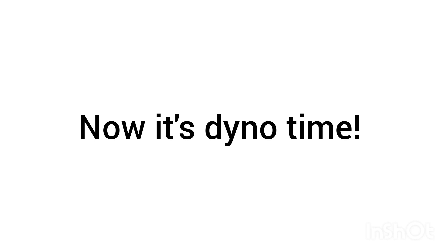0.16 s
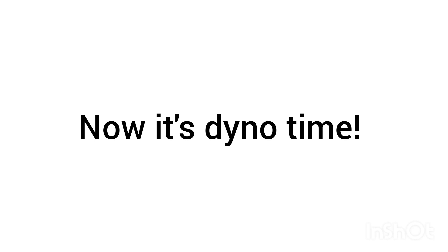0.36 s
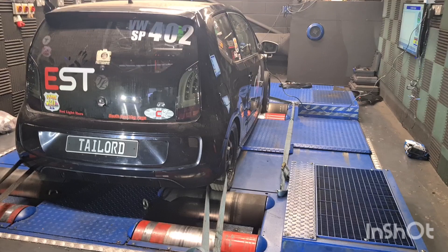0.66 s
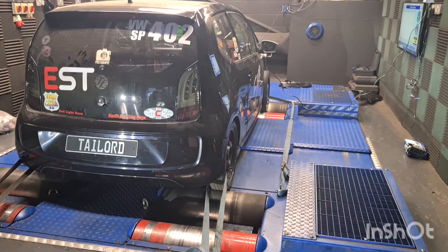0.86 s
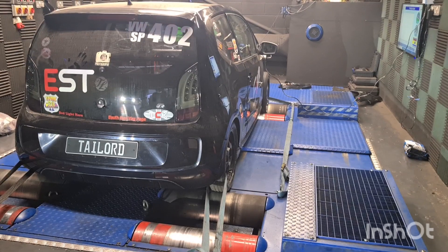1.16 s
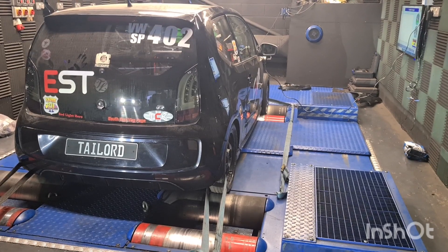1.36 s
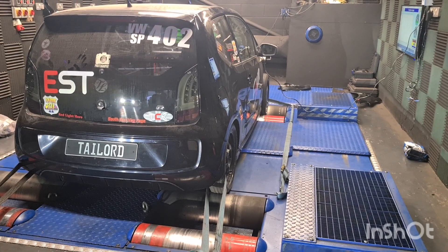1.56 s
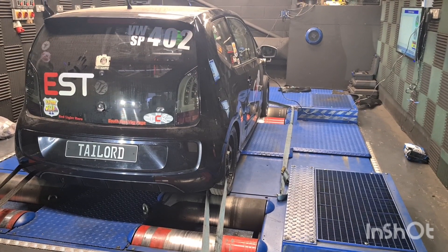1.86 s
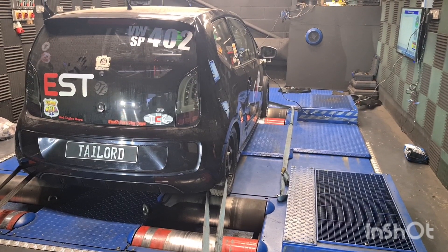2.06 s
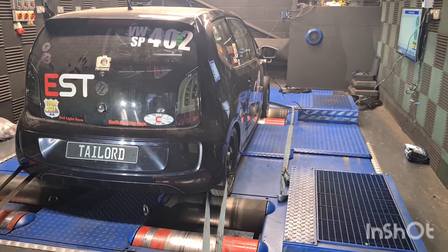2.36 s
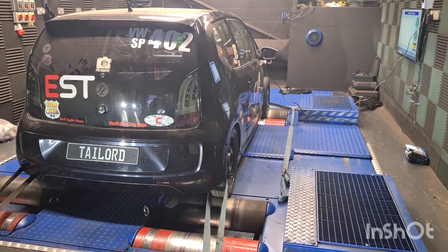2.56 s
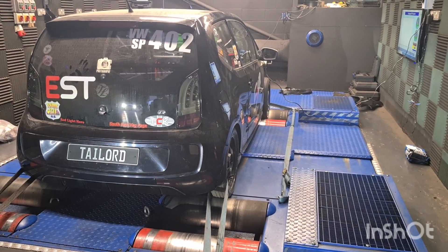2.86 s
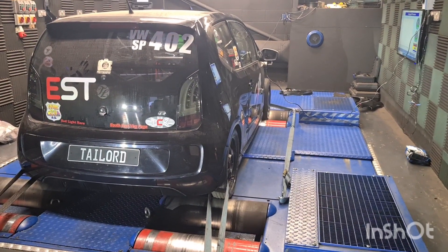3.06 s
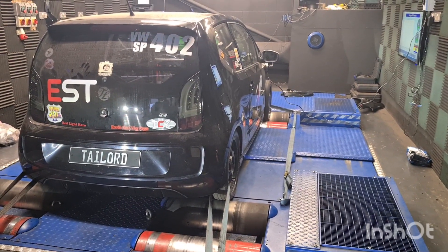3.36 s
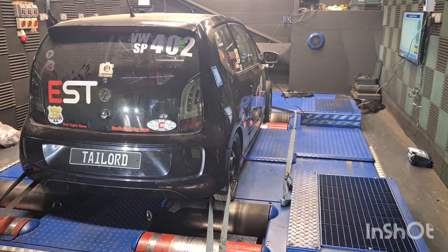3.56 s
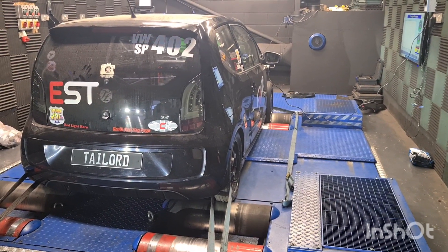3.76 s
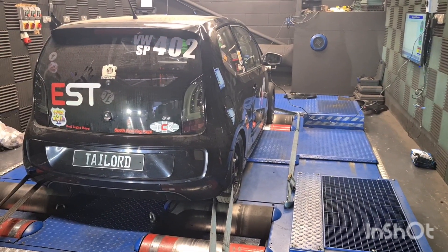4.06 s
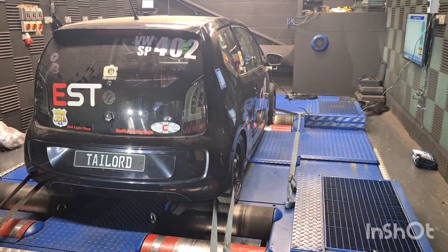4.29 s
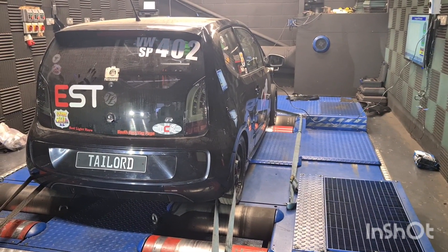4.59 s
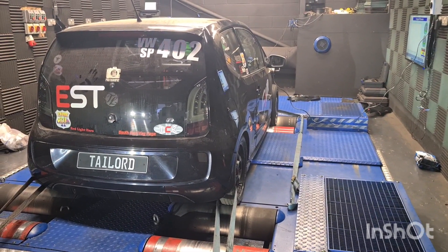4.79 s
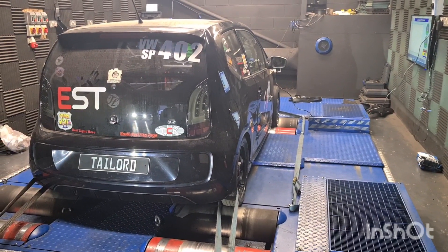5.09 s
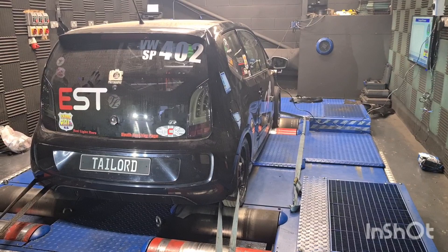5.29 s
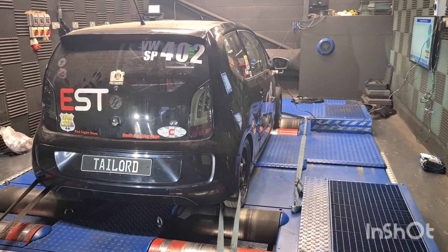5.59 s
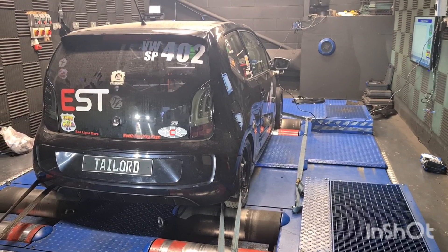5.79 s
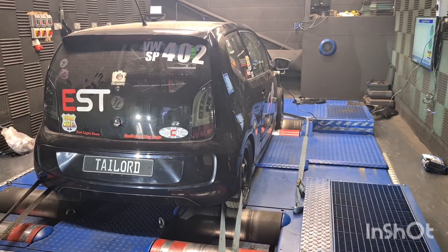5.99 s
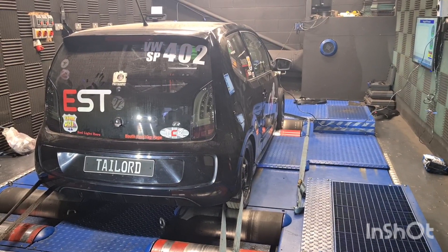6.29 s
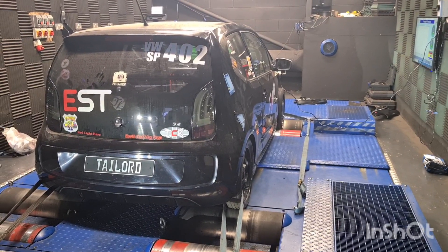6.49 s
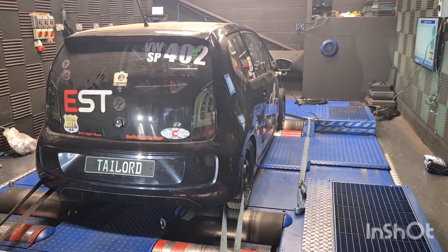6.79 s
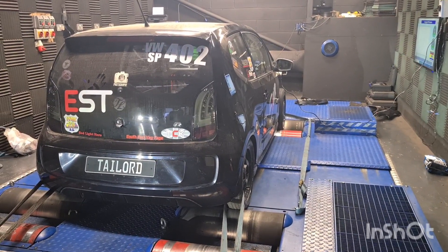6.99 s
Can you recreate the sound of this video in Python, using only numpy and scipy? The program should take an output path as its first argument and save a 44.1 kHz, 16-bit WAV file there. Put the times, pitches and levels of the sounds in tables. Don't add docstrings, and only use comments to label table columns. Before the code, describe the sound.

Silence until about 0.7 s, when a turbocharged five-cylinder car engine cuts in instantly, already pulling hard on dynamometer rollers. The onset is the brightest moment: barking exhaust pulses and a rush of intake air that fades over the next second. The rough, lumpy drone has a firing pitch near 80 Hz, rising quickly at first, then steadily to about 160 Hz by 7.1 s. As it climbs, fixed tailpipe and room resonances swell and recede, colouring the growl. Breathy boost surges brighten it gently around 2.1 s, more strongly at 3.4 s and again near 5.9 s. Exhaust effort is fullest around 5.7 s. Wide, lightly pulsing hiss from gas, tyres and cooling fans runs throughout, its finest top thinning around 4.8 s, above low, lumpy roller rumble. Close stereo perspective behind the car in a padded workshop, slightly saturated, ending with revs still high.

```python
import sys
import numpy as np
from scipy import signal
from scipy.fft import rfft, irfft, next_fast_len
from scipy.io import wavfile

SR = 44100
rng = np.random.default_rng(int(sys.argv[2]) if len(sys.argv) > 2 else 0)


def output_pcm(signal):
    pcm = np.clip(np.atleast_2d(signal).T, -1, 1) * 32767
    wavfile.write(sys.argv[1], SR, np.round(pcm).astype(np.int16))


def gain_from_db(level_db):
    decades = np.asarray(level_db, float) / 20
    return 10 ** decades


N = 314874

START_S = 0.6925
CYLINDERS = 5
RING_UP_S = 0.065
LOW_ORDER, TOP_ORDER = 3, 44


def seconds():
    return np.arange(N) / SR


def rms_one(x):
    return x / np.sqrt(np.mean(x ** 2) + 1e-20)


def filtered(x, order, hz, kind):
    return signal.sosfilt(signal.butter(order, hz, kind, fs=SR, output="sos"), x)


def in_time(rows, lead_s=0):
    knots_s, *columns = np.transpose(rows)
    return [np.interp(seconds() + lead_s, knots_s, column) for column in columns]


def at_hz(points, hz):
    points_hz, values = np.transpose(points)
    return np.interp(np.log(hz), np.log(points_hz), values)


def drift(rate_hz):
    every = 40
    pole = np.exp(-2 * every * np.pi * rate_hz / SR)
    white = rng.standard_normal(N // every + 2002)
    slow = signal.lfilter([1], [1, -2 * pole, pole * pole], white)[2000:]
    return np.interp(np.arange(N) / every, np.arange(len(slow)), rms_one(slow - slow.mean()))


def progress():
    return np.clip((seconds() - START_S) / (N / SR - START_S), 0, 1)


def fade(fade_s):
    return np.exp(-np.maximum(seconds() - START_S, 0) / fade_s)


# start_s, cycles_hz (full two-turn cycles)
SPEED_CURVE = [
    (0.7, 15.88),
    (1.0, 17.05),
    (1.3, 17.91),
    (1.8, 19.12),
    (3.55, 23.42),
    (4.3, 25.22),
    (5.7, 28.51),
    (6.55, 30.61),
    (7.14, 32.15),
]


def firing_phase():
    return 2 * np.pi * CYLINDERS * np.cumsum(in_time(SPEED_CURVE, RING_UP_S)[0]) / SR


# start_s, strength (0-1), fade_s
BOOST_SURGES = [
    (0.75, 1, 1),
    (2.13, 0.32, .6),
    (3.44, 0.67, 0.21),
    (5.63, 0.02, 0.39),
    (5.9, 0.48, 0.26),
    (6.17, 0.2, 0.62),
    (7.0, 0.1, 0.04),
]


def boost_surges():
    t, rise_s, total = seconds(), 0.13, 0
    for peak_s, strength, fade_s in BOOST_SURGES:
        total = total + strength * np.exp(np.where(t < peak_s, (t - peak_s) / rise_s, (peak_s - t) / fade_s))
    return total


# start_level_db, end_level_db (over the pull)
LOW_ORDERS = [(-63, -40), (-39.5, -38.5), (-19.5, -24), (-32.5, -32), (-30, -38.5), (-35.5, -33.5),
              (-32.5, -25.6), (-19.5, -20.5), (-32, -29.5), (-30.5, -34.5), (-26, -36), (-24.5, -31.5),
              (-23.5, -27), (-28, -37), (-33.5, -36.5), (-38, -28.5), (-36.5, -37), (-34.5, -29),
              (-35, -39.5), (-46.1, -42), (-41.2, -33.5), (-35.5, -34.5), (-37.5, -37.5)]
# start_level_db, end_level_db
UNEVEN_CYLINDERS = [
    (0, 9.5),
    (3.5, -11),
    (0, 2),
    (0.5, 6),
    (1.5, -1),
]


def order_levels():
    order = np.arange(LOW_ORDER, TOP_ORDER + 1)
    upper = order[len(LOW_ORDERS):]
    slopes = [(-42.5, 0.3), (-39.5, 0.54)]
    levels = []
    for low, (top_db, loss_db), uneven in zip(np.transpose(LOW_ORDERS), slopes, np.transpose(UNEVEN_CYLINDERS)):
        upper_db = top_db - loss_db * (upper - upper[0]) + uneven[upper % CYLINDERS]
        levels.append(np.append(low, upper_db))
    return list(zip(order, *levels))


# start_s, level_db (pulse strength)
EXHAUST_EFFORT = [(0.7, -3), (1.05, -0.5), (1.42, -3), (2.13, 2), (2.85, 3), (3.3, 3), (3.7, 3.5),
                  (4.28, 0.7), (4.99, 3), (5.71, 5.5), (6.1, 4), (6.55, 3.5), (7.14, 2)]


def exhaust_pulses(firing, boost):
    step = 8
    lope_order = 9
    along = progress()
    sharp_db = (1.5 + 9.5 * boost - 6.5 * along)[::step]
    bark_db = 10 * fade(0.74)[::step]
    along, boost = along[::step], boost[::step]
    cycle = (firing / CYLINDERS + 0.012 * drift(3))[::step]
    tones = 0
    for order, first_db, last_db in order_levels():
        fires = order % CYLINDERS == 0
        scattered = not fires and order >= lope_order
        phase = rng.uniform(0, 2 * np.pi) * scattered
        flicker_db = min(0.2 * order, 2.5) * drift(5)[::step] * (0.3 if fires else 1)
        level_db = first_db + (last_db - first_db) * along + flicker_db
        level_db += sharp_db * (order / TOP_ORDER) ** 2 + bark_db * (order in (15, 20))
        level_db -= 0.5 * boost * (order == 2 * CYLINDERS)
        tones = tones + gain_from_db(level_db) * np.cos(order * cycle + phase)
    tones = signal.resample_poly(tones, step, 1)[:N]
    return gain_from_db(in_time(EXHAUST_EFFORT, RING_UP_S)[0]) * tones


def pipe_roar(firing, boost):
    dull = signal.lfilter([1], [1, -0.892], rng.standard_normal(N))
    puffed = filtered(dull * (1 + 0.44 * np.cos(firing)), 3, 75, "high")
    return gain_from_db(-29 + 3 * boost - 2.5 * progress()) * rms_one(puffed)


def resonate(x, modes, top_hz):
    size = next_fast_len(N + SR)
    f = np.arange(round(top_hz * size / SR)) * SR / size
    response = 0
    for hz, width_hz, left, right in modes:
        mode = 1j * f * width_hz / (hz ** 2 - f ** 2 + 1j * f * width_hz)
        response = response + np.outer([left, right], mode)
    return irfft(rfft(x, size)[..., :len(f)] * response, size)[:, :N]


# pitch_hz, width_hz, left_gain, right_gain
ROOM_RESONANCES = [(54.8, 11.2, 2.75, 3.14), (71.3, 11.4, 0.51, 0.56), (86.1, 7.4, 2.02, 2.46),
                   (107.7, 3.7, 0.33, 0.39), (117.9, 4.0, 2.37, 2.24), (128.4, 6.2, -3.07, -3.61),
                   (145.5, 16.5, -0.33, -0.6), (155.2, 72.1, -1.18, -0.64), (163.6, 3.7, 4.03, 4.26),
                   (179.7, 10.1, 3.27, 3.82), (197.4, 14.3, -3.55, -3.99), (205.3, 60.1, 4.18, 4.14),
                   (220.6, 28.4, -6.08, -6.41), (223.3, 8.3, 5.1, 5.31), (235.9, 11.3, 0.37, 0.56),
                   (258.5, 5.1, -0.87, -0.9), (291.0, 26.9, 3.32, 4.11), (292.2, 37.1, -3.51, -4.4),
                   (306.3, 5.2, 1.96, 2.59), (317.1, 4.4, -1.02, -2.07), (326.9, 22.3, 0.74, 1.31),
                   (343.5, 7.7, -3.29, 0.08), (343.9, 8.9, 3.0, -0.14), (374.7, 24.4, 0.55, 1.42),
                   (387.4, 5.7, 2.34, 1.83), (401.0, 3.7, 1.18, 1.55), (422.3, 10.0, -1.7, -2.71),
                   (441.4, 7.5, -1.7, -1.72), (453.8, 3.7, 0.33, -1.69), (471.3, 4.4, -0.25, 1.58)]
# pitch_hz, width_hz, left_gain, right_gain
PIPE_RESONANCES = [(492.3, 5.3, 2.14, 0.66), (513.0, 18.6, 1.33, 1.34), (529.1, 6.7, 0.67, 4.03),
                   (545.3, 10.4, 3.28, 0.64), (565.7, 7.2, -1.38, -0.21), (595.9, 6.9, 0.16, 0.79),
                   (616.5, 3.7, 0.32, 0.47), (633.5, 4.5, 0.42, 0.73), (655.5, 18.9, 0.79, 0.36),
                   (692.3, 26.2, 4.44, 1.37), (694.0, 22.6, -4.2, -0.33), (722.5, 14.6, 1.33, 0.53),
                   (745.2, 87.5, -2.34, -3.34), (746.8, 55.3, 2.3, 3.53), (809.3, 6.9, -2.05, -0.3),
                   (834.1, 8.3, 2.28, 2.12), (866.3, 7.9, 0.34, 0.37), (880.9, 9.0, -0.6, -1.14),
                   (904.9, 7.3, -0.27, -0.48), (925.6, 11.1, -0.2, -1.16), (969.6, 53.9, -1.04, 0.64),
                   (1024.6, 25.8, 1.34, 1.7), (1044.4, 8.8, 0.76, 1.97), (1097.7, 47.8, 0.15, 1.12),
                   (1105.2, 10.2, -0.68, -2.81), (1127.8, 17.6, -0.0, 0.7), (1172.0, 16.2, 0.18, 0.62),
                   (1225.7, 16.1, -1.09, -0.49), (1332.0, 37.3, 5.04, 7.87), (1337.6, 59.0, -5.43, -6.43)]


def exhaust(firing, boost):
    source = exhaust_pulses(firing, boost) + pipe_roar(firing, boost)
    left, right = resonate(source, ROOM_RESONANCES + PIPE_RESONANCES, top_hz=5000)
    return np.array([np.roll(left, -3), right])


# pitch_hz, correlation (-1 to 1)
PORT_LIKENESS = [(60, 0.92), (130, 0.65), (290, 0.9), (640, 0.014), (1410, -0.81), (3100, -0.66),
                 (6820, -0.65), (15000, -0.18)]
# pitch_hz, left_minus_right_db
PORT_LEAN = [(60, -1.0), (110, 15), (200, 2), (380, -15), (700, -1.5), (1290, -1), (2380, -6.5), (4400, -1),
             (8120, 0.5), (15000, -7.5)]


def banded_noise(spectrum, patchy_db, shared_db):
    edges = np.geomspace(spectrum[0][0], min(spectrum[-1][0], 17000), num=17)
    together = drift(19.0)
    white = rng.standard_normal((2, 2, N))
    opposite = np.array([[1], [-1]])
    out = 0
    for k, (low, high) in enumerate(zip(edges, edges[1:])):
        mid, side = filtered(white[k % 2], 2, [low, high], "band")
        hz = np.sqrt(low * high)
        alike = np.clip(at_hz(PORT_LIKENESS, hz), -1, 1)
        gain = gain_from_db(at_hz(spectrum, hz) + shared_db * together + patchy_db * drift(10.5))
        lean = gain_from_db(at_hz(PORT_LEAN, hz) / 2 * opposite)
        out = out + gain * lean * (np.sqrt(1 + alike) * mid + np.sqrt(1 - alike) * side * opposite)
    return rms_one(out)


def scatter(x, t60_s, wet_db):
    age_s = np.arange(SR // 8) / SR
    echoes = rng.standard_normal((2, len(age_s))) * gain_from_db(-60 * age_s / t60_s)
    echoes = gain_from_db(wet_db) * echoes / np.linalg.norm(echoes, axis=1, keepdims=True)
    return rms_one(x + signal.fftconvolve(x, echoes, axes=1)[:, :N])


def thin_air(air):
    top = filtered(air, 2, 9800, "high")
    dip = np.exp(-((seconds() - 4.8) / 1.9) ** 2)
    return air + (gain_from_db(2 - 2 * dip) - 1) * top


# pitch_hz, level_db (per Hz)
HISS_SPECTRUM = [(290, -18.5), (500, -6), (530, -13.5), (594, -52), (676, -11), (792, -10.5), (901, -10.5),
                 (1030, -8.5), (1990, -13.5), (2170, -13.5), (2570, -17), (3240, -12.5), (5680, -12.5),
                 (12300, -32), (15500, -94)]
# pitch_hz, width_hz, level_db
HISS_HUMPS = [(1696, 130, 0.5), (2247, 140, -3.5), (3277, 190, -4.5), (4650, 190, -4), (12230, 270, -15.5)]


def hiss(firing, boost):
    along = progress()
    level_db = -25.5 + 3.5 * boost + 2.5 * along
    rasp_db = 1 + 3 * boost + 2.5 * along
    broad = banded_noise(HISS_SPECTRUM, patchy_db=0.73, shared_db=0.33)
    broad = scatter(broad + 0.3 * broad[::-1], t60_s=0.12, wet_db=-6.5)
    broad = broad + (gain_from_db(rasp_db) - 1) * filtered(broad, 2, 2800, "low")
    humps = [(hz, width_hz, gain_from_db(db), gain_from_db(db)) for hz, width_hz, db in HISS_HUMPS]
    whistles = rms_one(resonate(rng.standard_normal((2, N)), humps, top_hz=16000))
    pulsing = 1 + 0.085 * np.cos(firing)
    return thin_air(gain_from_db(level_db) * pulsing * (broad + gain_from_db(-10) * whistles))


# pitch_hz, level_db (per Hz)
RUMBLE_SPECTRUM = [(18, -14), (30, -9), (47, -7), (70, -5), (200, -12), (600, -6)]


def roller_rumble():
    level_db = -35 + 3 * drift(4.0)
    return gain_from_db(level_db) * banded_noise(RUMBLE_SPECTRUM, patchy_db=-2.0, shared_db=-0.5)


def intake_whoosh():
    centre_hz, width_hz = 2400, 1300
    edges_hz = [centre_hz - width_hz / 2, centre_hz + width_hz / 2]
    rush = filtered(rng.standard_normal((2, N)), 1, edges_hz, "band")
    return gain_from_db(-30) * fade(0.52) * rms_one(rush)


def scene():
    firing, boost = firing_phase(), boost_surges()
    cut_in = np.clip((seconds() - START_S) / 0.001, 0, 1)
    return (exhaust(firing, boost) + hiss(firing, boost) + roller_rumble() + intake_whoosh()) * cut_in


def roll_off(x):
    return signal.sosfilt(signal.butter(12, 15680, fs=SR, output="sos"), x)


def record(dry):
    top = 2
    dulled = filtered(dry, 2, 14500, "low")
    mix = top * np.tanh(dulled / top)
    return roll_off(mix)


dry = scene()
out = record(dry)
output_pcm(out)
```